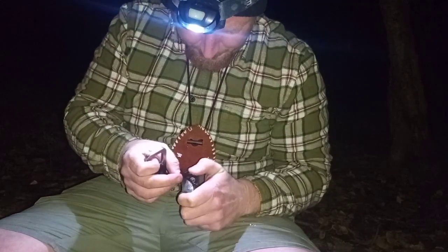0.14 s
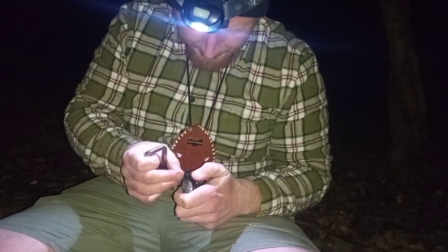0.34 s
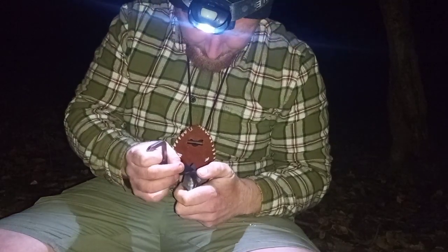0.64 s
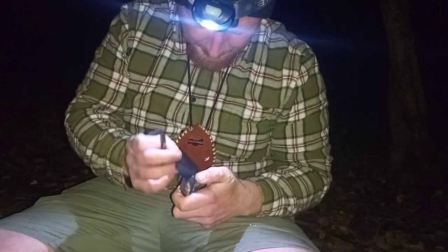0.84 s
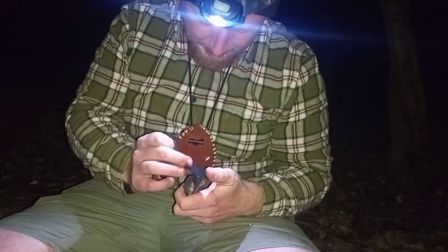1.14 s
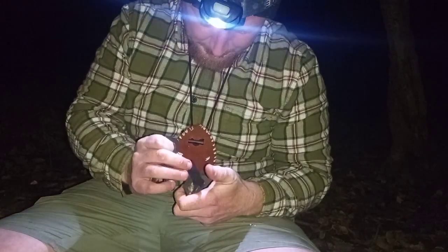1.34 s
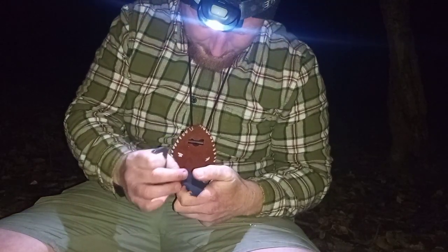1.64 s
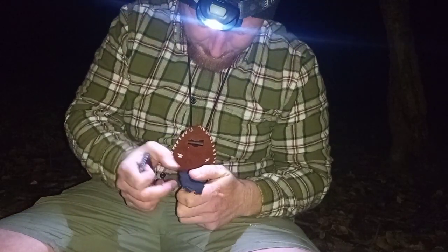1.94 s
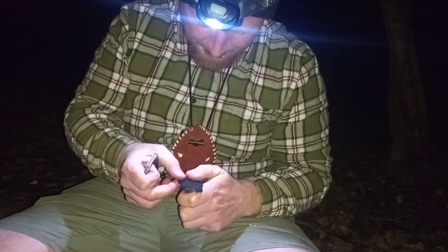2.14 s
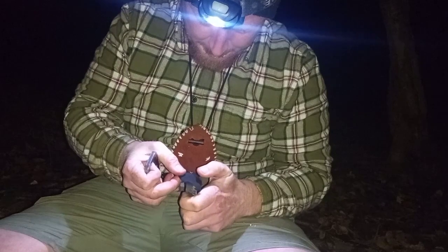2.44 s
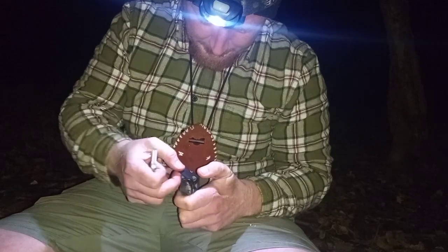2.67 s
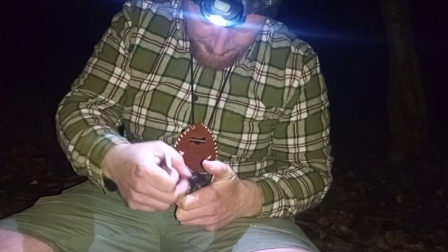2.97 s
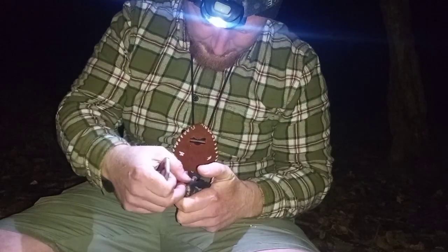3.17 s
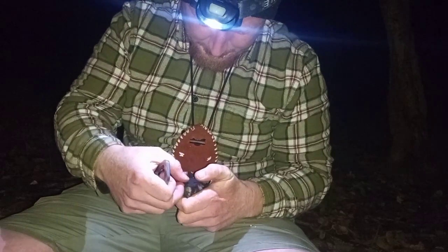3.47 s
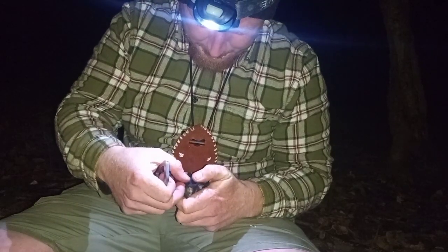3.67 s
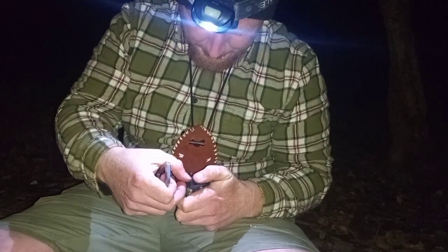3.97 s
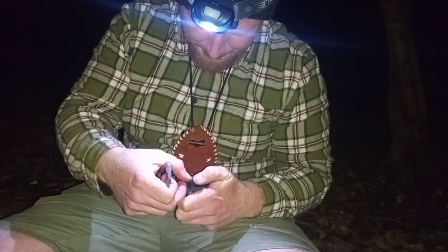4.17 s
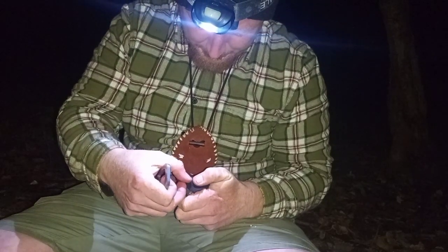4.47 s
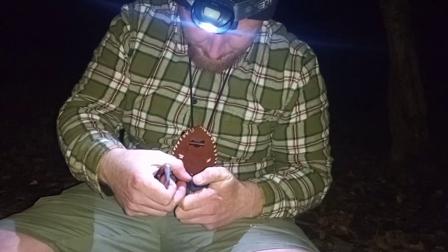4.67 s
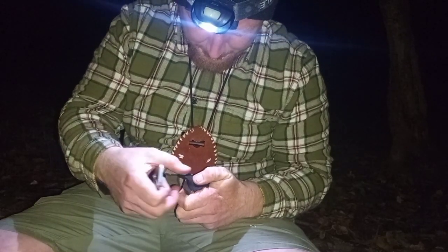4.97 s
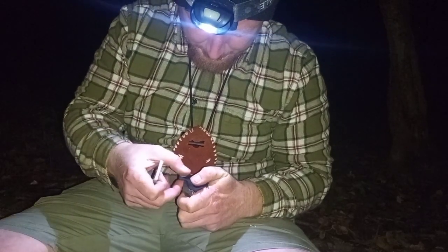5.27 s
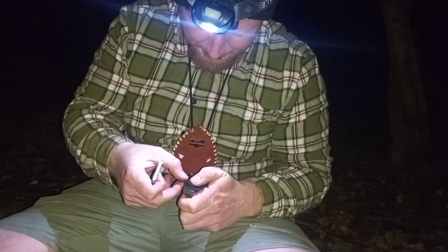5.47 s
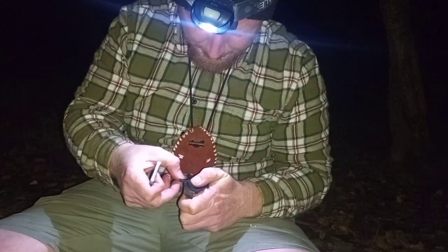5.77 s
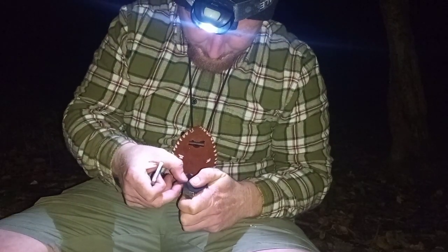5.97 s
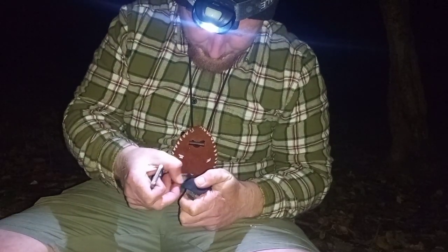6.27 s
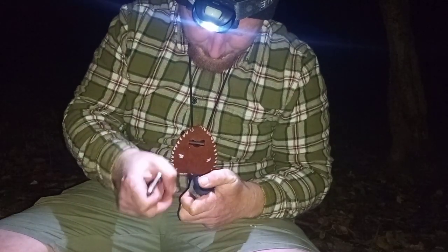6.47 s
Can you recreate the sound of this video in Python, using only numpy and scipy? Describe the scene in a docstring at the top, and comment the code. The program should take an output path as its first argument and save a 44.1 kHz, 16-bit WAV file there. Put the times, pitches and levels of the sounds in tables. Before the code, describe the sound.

Quiet night woods: tiny stone-and-steel ticks, one hard snapping strike, then busier faint clicks while a low aircraft-like rush swells and fades away.

```python
"""A steel striker clips a flint once, sharply, in a wood at night: a broadband crack, two quick further
contacts and a brief ring. Around the blow, stone and steel tick faintly through damped resonances, and fingers
rub in soft noise bursts. Each contact passes through short, discrete echoes and a decaying scatter from close
by. Behind lies a low rush like a far aircraft: filtered noise that swells and fades, with a thin, sinking
whistle. Faint hiss, a few insect pips over their chorus, and a late whine complete the background."""
import sys
import numpy as np
from scipy import signal
from scipy.fft import rfft, irfft
from scipy.io import wavfile
from scipy.ndimage import uniform_filter1d

SR = 44100
rng = np.random.default_rng(int(sys.argv[2]) if len(sys.argv) > 2 else 0)


def inscribe(sig):
    """Save sig as 16-bit PCM at rate SR to the path in sys.argv[1].

    A 1-D sig is mono; a 2-D sig holds one channel per row.
    Samples are clipped to [-1, 1] before scaling.
    """
    pcm = np.round(np.clip(np.atleast_2d(sig).T, -1, 1) * 32767)
    wavfile.write(sys.argv[1], SR, pcm.astype(np.int16))


N = 291941

TIME = np.arange(N) / SR
FREQS = np.maximum(np.arange(N // 2 + 1) * SR / N, 1)


def strike(level_db):
    """Impulsive excitation: a bright crack with two close, weaker further contacts, and a modal ring."""
    # the crack and two quick further contacts: t/s, level/dB before level_db is added
    crack_and_contacts = [(2.3355, -32), (2.338, -42), (2.3397, -43)]
    # spectrum of the crack: f/Hz, level/dB
    strike_colour = [(1500, -30), (2800, -24), (3300, 0), (4600, 0), (6100, 4), (8000, -6), (10200, 1),
                     (11700, 0), (13400, -6), (15000, 4), (16600, -3)]
    # modes of the struck steel: f/Hz, width/Hz, level/dB
    steel_modes = [(9950, 70, -33), (10500, 120, -31), (14900, 80, -26), (15300, 120, -26)]
    sparks_db, sparks_s = -61, .011  # chips and sparks fly off: snap level, decay time
    s, db = np.transpose(crack_and_contacts)
    force = contacts(s, db + level_db, grit_db=-11, grit_s=.0005)
    sparks = contacts(s[:1], [sparks_db], grit_db=5, grit_s=sparks_s)
    ring = 0
    for hz, width_hz, mode_db in steel_modes:
        ring = ring + from_db(mode_db) * resonate(force, hz, width_hz)
    return colour(force + sparks, strike_colour) + ring


def ticks(delay_s):
    """Modal excitation: light touches ring one set of modes; brighter touches favour the higher ones."""
    # light touches of flint and steel: t/s, nominal level/dB, brightness/dB
    touches = [(0.2723, -68, -14.5), (0.5589, -71.5, -15), (0.826, -65, -15), (1.044, -70.5, -17),
               (1.3646, -61, -18.5), (1.8297, -71.5, -13.5), (2.165, -62, -16), (2.5686, -55.5, -18),
               (2.7202, -58.5, -28), (2.9753, -64, -14), (3.021, -59, -16), (3.221, -64, -15.5),
               (3.2705, -70, -23), (3.8292, -64, -17), (3.858, -61, -19), (3.9095, -62.5, -12.5),
               (3.9424, -81, -11), (4.0942, -67, -14), (4.2512, -75, -14), (4.3555, -70.5, -10.5),
               (4.5456, -67, -13), (4.7017, -69, -13), (4.8522, -70, -15), (5.0194, -68, -16),
               (5.0657, -66, -14.5), (5.2957, -78, -12), (5.4091, -65, -25), (5.4198, -65.5, -16),
               (5.6334, -58, -18), (5.6637, -64, -17), (5.7438, -66, -16), (5.7816, -63, -29),
               (5.8562, -56.5, -20), (5.9624, -52, -18), (5.9794, -65, -19), (6.0092, -65, -19),
               (6.285, -62, -18), (6.5152, -61, -16), (6.573, -62, -13)]
    # modes that the touches ring: f/Hz, width/Hz, level/dB before the grip's damping
    tick_modes = [(6130, 500, -8), (7170, 300, -9), (8500, 350, -3), (9100, 400, -2), (9850, 400, 1),
                  (10700, 500, -1), (11500, 800, -3), (13000, 1500, -7), (14500, 500, -7), (15300, 600, -3)]
    mode_level_db = -15.5  # one mode against the nominal level
    skid_db, skid_s = -14.5, 0.0045  # grating of the edge against the snap, and its decay time
    # neutral brightness rings evenly; tilt is in dB per octave for each dB of brightness
    neutral_db, tilt_db_per_octave, pivot_hz = -18, 7.5, 10800
    low_reach_octaves = 0.077  # modes further below the pivot than this tilt alike
    grip_hz, grip_db = 8000, -6.5  # the fingers damp the modes below this frequency
    grip_scatter_db = 4  # random spread of each mode's excitation
    faint_per_s, faint_db = 5, -74  # still fainter touches come at random

    faint_times = rng.uniform(0, N / SR - delay_s, int(faint_per_s * N / SR))
    faint = [(s, faint_db, neutral_db) for s in faint_times]
    s, peak_db, bright_db = np.transpose(with_crumbs(touches, count=4) + faint)
    out = np.zeros(N)
    for k, (hz, width_hz, db) in enumerate(tick_modes):
        octaves = max(np.log2(hz / pivot_hz), -low_reach_octaves)
        tilt_db = tilt_db_per_octave * (bright_db - neutral_db) * octaves
        scatter_db = grip_scatter_db * rng.standard_normal(len(s))
        levels_db = peak_db + mode_level_db + tilt_db + scatter_db
        force = contacts(s + delay_s, levels_db, skid_db, skid_s)
        gain = from_db(db + grip_db * (hz < grip_hz))
        out += (-1) ** k * gain * resonate(force, hz, width_hz)  # neighbouring modes alternate in sign
    return out


def with_crumbs(touches, count):
    """Multiple microcontacts: crumbs of grit scatter weaker touches in time around each main one."""
    crumb_db, crumb_spread_db = -14, 2  # against the touch
    late_s, spread_s = 0.0063, 0.0076  # mean lateness and spread in time
    chance = rng.standard_normal((len(touches), count, 2))
    crumbs = []
    for (s, db, bright), draws in zip(touches, chance):
        for when, size in draws:
            crumb_s = s + late_s + spread_s * when
            crumbs.append((crumb_s, db + crumb_db + crumb_spread_db * size, bright))
    return list(touches) + [row for row in crumbs if 0 < row[0] < TIME[-SR // 100]]


def clinks():
    """Damped single-mode resonance: the nudged steel rings for a moment under the fingers."""
    # small clinks: t/s, contact level/dB, f/Hz, width/Hz
    clink_events = [(0.9503, -59, 4810, 330), (3.323, -74, 9950, 169.3), (4.1494, -70, 9860, 222.3),
                    (4.4457, -66, 9860, 138.7), (6.057, -67, 7400, 230)]
    out = 0
    for s, db, hz, width_hz in clink_events:
        out = out + resonate(contacts([s], [db], grit_db=-13.5, grit_s=0.0014), hz, width_hz)
    return out


def fidget(per_s, level_db, spread_db):
    """Friction noise: fingers rub stone and cloth in grainy swells that also excite a resonance in the flint."""
    # spectrum of finger grit: f/Hz, level/dB
    grit_colour = [(3000, -23.5), (6200, -9), (8000, -8), (9400, 0.5), (10700, 2), (13200, -1), (15200, 5),
                   (16300, -10)]
    rub_s = .04  # median length of a rub; each runs from half to twice this
    # the ring's pitch depends on where the flint is held; its level is against the grains
    low_hz, high_hz, width_hz, ring_db = 9000, 11000, 150, -14.5
    out, age = np.zeros(N + SR), np.arange(SR // 4) / SR
    for when, size, length, pitch in rng.random((int(per_s * N / SR), 4)):
        rub_length_s = rub_s * 2 ** (2 * length - 1)
        swell = np.sin(np.pi * np.minimum(age / rub_length_s, 1)) ** 2
        grains = from_db(level_db + spread_db * size ** 2) * swell * rng.standard_normal(len(age))
        ring = resonate(grains, low_hz + pitch * (high_hz - low_hz), width_hz)
        at = int(when * N)
        out[at:at + len(age)] += grains + from_db(ring_db) * ring
    return colour(out[:N], grit_colour)


def contacts(times, levels_db, grit_db, grit_s):
    """Impulse and decaying noise: each entry is one snap, then exponentially dying grit."""
    out, age = np.zeros(N), np.arange(2048) / SR
    grains = rng.standard_normal((len(times), len(age)))
    for s, db, grain in zip(times, levels_db, grains):
        # squaring with the sign kept makes the grit spiky
        force = from_db(grit_db) * grain * np.abs(grain) * np.exp(-age / grit_s)
        force[0] = 1
        at = int(s * SR)
        out[at:at + len(age)] += from_db(db) * force[:N - at]
    return out


def surroundings(x, scatter_db, scatter_t60):
    """Early reflection and scattering: echoes from body and ground, with a decay from leaves and trunks."""
    # close echoes: delay t/s, level/dB
    close_echoes = [(.00245, -15), (.0038, -11.5), (.007, -15.5), (0.0095, -21)]
    age = np.arange(SR // 4) / SR
    response = from_db(scatter_db - 60 * age / scatter_t60) * rng.standard_normal(len(age))
    response[0] = 1
    for delay_s, db in close_echoes:
        response[int(delay_s * SR)] += from_db(db)
    return signal.fftconvolve(x, response)[:N]


def distant_rush():
    """Turbulent noise in propagation: separate bands fade in and out on the long way through the air."""
    # spectrum of the rush: f/Hz, level/dB
    rush_colour = [(25, -46), (38, -33), (62, -14.5), (105, 9), (150, 3.5), (210, -3), (280, -1),
                   (450, -13.5), (660, -18), (1000, -22.5), (1550, -34.5), (2000, -49.5), (2500, -59.5),
                   (2850, -55.5), (3100, -60)]
    # spectrum of the steady deep rumble of the distance: f/Hz, level/dB
    drone_colour = [(10, -39.5), (25, -28), (45, -8.5), (66, 1.5), (85, 3.5), (130, -18.5), (300, -71),
                    (1000, -110)]
    # deep rumble, before its trim: t/s, level/dB
    rumble_points = [(0, -38), (0.55, -37), (1.0, -34), (1.6, -34), (2.3, -41.5), (2.7, -38), (2.93, -34),
                     (3.2, -42.5), (5.3, -45), (6.62, -42.5)]
    # boom between rumble and body, before its trim: t/s, level/dB
    boom_points = [(0.0, -40), (0.53, -43.5), (0.77, -36.5), (0.79, -40.5), (1.51, -47), (1.75, -36.5),
                   (2.06, -42.5), (2.16, -39.5), (2.99, -40), (3.74, -55), (4.39, -47.5), (4.63, -53),
                   (4.96, -49), (5.9, -60.5), (6.32, -52.5), (6.62, -55.5)]
    # hollow body, before its trim: t/s, level/dB
    body_points = [(0, -41), (0.55, -47.5), (0.75, -46), (1.0, -50.5), (1.38, -54), (1.85, -39.5),
                   (2.3, -38), (2.5, -43), (2.8, -44), (3.15, -48.5), (3.8, -54.5), (4.25, -46.5),
                   (4.65, -54), (5.0, -48), (5.55, -50), (5.8, -55.5), (6.05, -51), (6.62, -61)]
    # roar and its upper edge, before their trims: t/s, roar level/dB, edge level/dB
    roar_points = [(0.0, -49.5, -57.5), (0.24, -58, -61.5), (0.57, -56.5, -62.5), (0.83, -50, -59.5),
                   (0.88, -55, -63.5), (1.44, -58, -67.5), (1.6, -52.5, -62.5), (1.731, -48.5, -57.5),
                   (2.03, -42.5, -56.5), (2.32, -49.5, -59.5), (2.53, -60.5, -58), (2.891, -51.5, -59.5),
                   (3.24, -55.5, -66), (3.359, -52.5, -63.5), (3.85, -69, -71), (4.02, -61.5, -65.5),
                   (4.35, -55.5, -68), (4.46, -60, -71.5), (4.83, -58.5, -65), (4.939, -51, -62),
                   (5.29, -52.5, -63), (5.71, -61.5, -72), (6.62, -63.5, -69)]
    drone_db = -52
    rumble_trim_db, boom_trim_db, body_trim_db, roar_trim_db, edge_trim_db = -0.4, -1.52, -1.47, -1, -4.6
    # the bright fringe opens faster than the edge: level at an edge of fringe_at_db, dB per dB of edge
    fringe_db, fringe_at_db, fringe_follows = -61, -56, 1.61
    dulling_db_per_s = 0.3  # the fringe fades as the rush recedes

    rumble, boom, body = in_time(rumble_points), in_time(boom_points), in_time(body_points)
    roar = in_time([(s, db) for s, db, _ in roar_points])
    edge = in_time([(s, db) for s, _, db in roar_points])
    fringe = fringe_db + fringe_follows * (edge - fringe_at_db) - dulling_db_per_s * TIME
    shimmer = flutter(depth_db=2.5, rate_hz=8.7)  # the air makes the top two bands flutter
    levels = [rumble + rumble_trim_db, boom + boom_trim_db, body + body_trim_db,
              roar + roar_trim_db, edge + edge_trim_db + shimmer, fringe + shimmer]
    edges_hz = [10, 205, 370, 680, 1300, 1800, 2450]
    turbulence = colour(with_echoes(rng.standard_normal(N)), rush_colour)
    out = from_db(drone_db) * rms_one(colour(rng.standard_normal(N), drone_colour))
    for low, high, level in zip(edges_hz, edges_hz[1:], levels):
        carrier = steadied(rms_one(band(turbulence, low, high)), window_s=0.25, share=0.26)
        out += from_db(level) * carrier
    return out + whistle(roar)


def with_echoes(x):
    """Comb interference: a dull ground echo carves gliding dips; trunks and body add a fixed ripple."""
    # ground echo's lag as the direction of the rush changes: t/s, lag t/s
    ground_lag = [(0.0, .00255), (1.4, .00245), (2.3, .00215), (3.6, 0.0018), (5.15, .00192), (5.8, .0018),
                  (6.62, 0.0018)]
    # echoes off body and trunks: delay t/s, level/dB
    trunk_echoes = [(.004, -23.5), (.0068, -14.5), (0.012, -16), (0.0138, -22.5), (0.016, -19.5),
                    (0.042, -16)]
    ground_db, ground_cut_hz = -7.5, 1400  # the leafy ground returns mostly the lows
    dull = irfft(rfft(x) / (1 + (FREQS / ground_cut_hz) ** 2), N)
    out = x + from_db(ground_db) * np.interp(TIME - in_time(ground_lag), TIME, dull)
    for delay_s, db in trunk_echoes:
        out = out + from_db(db) * np.roll(x, int(delay_s * SR))
    return out


def whistle(roar_db):
    """Narrowband modulation: a turbine-like line sinks steadily in pitch, wavers and swells with the roar."""
    start_hz, sag_hz_per_s, width_hz = 1568, 10.5, 24
    level_db, follows = -73.5, 0.37  # at the mean roar; dB per dB of roar
    tone = narrow_tone(start_hz - sag_hz_per_s * TIME, width_hz)
    swell = follows * (roar_db - roar_db.mean()) + flutter(depth_db=1.5, rate_hz=5)
    return from_db(level_db + swell) * tone


def night():
    """Superposition of weak sources: steady hiss, insect pips over a far chorus, and a late thin whine."""
    # spectrum of the hiss: f/Hz, level/dB
    hiss_colour = [(1760, -6), (2500, 1), (2900, 0), (3600, -2.5), (5000, -4.5), (6090, -3.5), (7940, -10),
                   (9660, -4), (13400, -12), (15000, -4), (16000, -4.5)]
    # pips of one high insect far off: t/s, level/dB, half length t/s (to 1/e)
    pips = [(0.103, -77, 0.03), (0.158, -91.5, 0.014), (0.628, -89.5, 0.015), (0.698, -86, 0.013),
            (0.749, -86, 0.024)]
    # upper tone of the whine, before its waver: t/s, level/dB
    whine_points = [(0.0, -110), (5.8, -105), (6.0, -98), (6.45, -90.5), (6.62, -86)]
    hiss_db, chirp_hz = -86.7, 3130
    chorus_db, chorus_hz, chorus_width_hz = -102, 3100, 150  # others of the insect's kind, blended
    whine_hz, whine_width_hz = 2580, 150
    under_hz, under_db = 1770, 3  # the whine's lower companion, level against the upper tone

    hiss = from_db(hiss_db) * rms_one(colour(rng.standard_normal(N), hiss_colour))
    chirping = sum(from_db(db) * np.exp(-((TIME - s) / half_s) ** 2) for s, db, half_s in pips)
    tones = narrow_tone(whine_hz, whine_width_hz)
    tones = tones + from_db(under_db) * narrow_tone(under_hz, whine_width_hz)
    whine = from_db(in_time(whine_points) + flutter(depth_db=2.5, rate_hz=13)) * tones
    pulsing = from_db(chorus_db + flutter(depth_db=3.5, rate_hz=12))
    chorus = pulsing * narrow_tone(chorus_hz, chorus_width_hz)
    return hiss + chorus + chirping * rms_one(np.sin(2 * np.pi * chirp_hz * TIME)) + whine


def narrow_tone(hz, width_hz):
    """Quadrature modulation: random level and phase about a steady or gliding pitch."""
    phase = 2 * np.pi * np.cumsum(hz * np.ones(N)) / SR
    tone = flutter(0.87, width_hz / 2) * np.cos(phase) + flutter(1, width_hz / 2) * np.sin(phase)
    return steadied(rms_one(tone), window_s=0.091, share=0.12)


def resonate(x, hz, width_hz):
    """Damped harmonic oscillator: a unit click gives a decaying ring of height about 1."""
    r, w = np.exp(-np.pi * width_hz / SR), 2 * np.pi * hz / SR
    return signal.lfilter([1, 0, -1], [1, -2 * r * np.cos(w), r * r], x + 1e-18) / 2


def flutter(depth_db, rate_hz):
    """Low-pass random modulation: a zero-mean swing of the given rms depth and corner rate."""
    swing = irfft(rfft(rng.standard_normal(N)) / (1 + (FREQS / rate_hz) ** 2), N)
    return depth_db * rms_one(swing - swing.mean())


def steadied(x, window_s, share):
    """Envelope compression: take out part of a noise's own slow power swings."""
    power = uniform_filter1d(x ** 2, max(int(window_s * SR), 8), mode="reflect")
    return rms_one(x / np.maximum(power, 1e-12) ** (np.clip(share, 0, 1) / 2))


def colour(x, points):
    """Linear filtering: shape by (f/Hz, level/dB) points joined on a logarithmic frequency axis."""
    hz, db = np.transpose(points)
    return irfft(rfft(x) * from_db(np.interp(np.log(FREQS), np.log(hz), db)), N)


def band(x, low, high):
    """Band-pass filtering: steep complementary edges let neighbouring bands sum to the whole."""
    return irfft(rfft(x) / ((1 + (low / FREQS) ** 12) * (1 + (FREQS / high) ** 12)), N)


def in_time(curve):
    """Linear interpolation: join (t/s, value) points by straight lines."""
    return np.interp(TIME, *np.transpose(curve))


def from_db(db):
    """Logarithmic level: decibels to amplitude gain."""
    return 10 ** (np.asarray(db) / 20)


def rms_one(x):
    """Power normalisation: scale to an rms of 1."""
    return x / np.sqrt(np.mean(x ** 2) + 1e-30)


def scene():
    """Superposition: hands and their reflections close by, the rush and night sounds far off."""
    blow = strike(level_db=4.5)
    rubbing = fidget(per_s=34, level_db=-100.5, spread_db=10.5)
    hands = blow + clinks() + ticks(delay_s=0.00061) + rubbing
    near = surroundings(hands, scatter_db=-36, scatter_t60=.1)
    return (near + distant_rush() + night())[None]


def record(dry):
    """Low-pass filtering: a zero-phase elliptic filter cuts the top steeply."""
    cutoff_hz = 15900
    return signal.sosfiltfilt(signal.ellip(10, .05, 70, cutoff_hz, fs=SR, output="sos"), dry)


dry = scene()
out = record(dry)
inscribe(out)
```